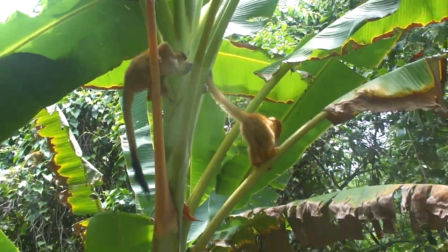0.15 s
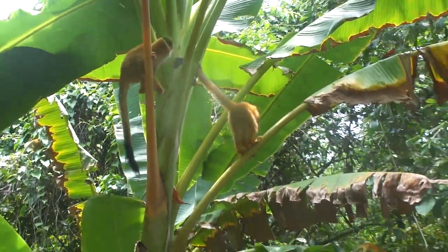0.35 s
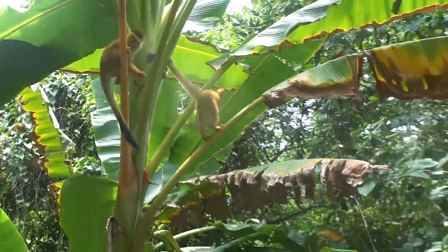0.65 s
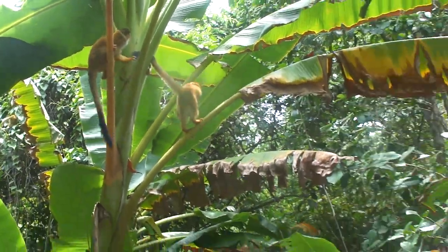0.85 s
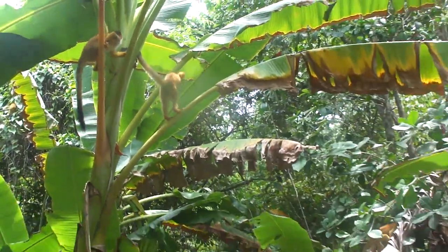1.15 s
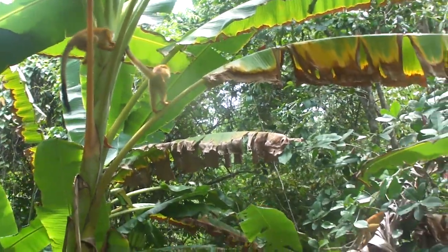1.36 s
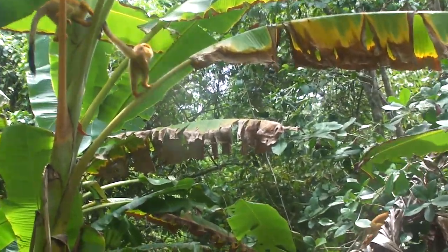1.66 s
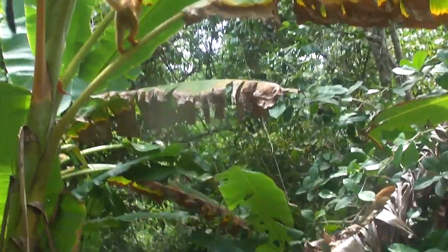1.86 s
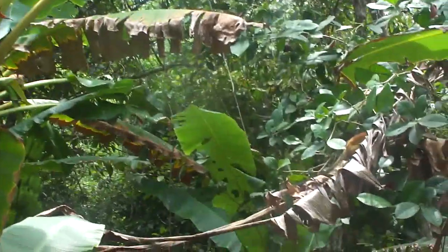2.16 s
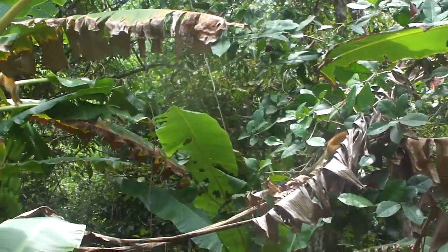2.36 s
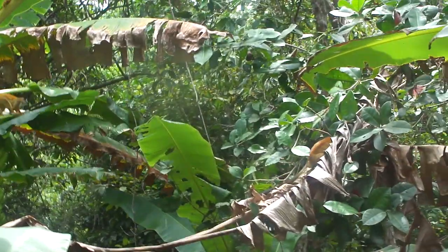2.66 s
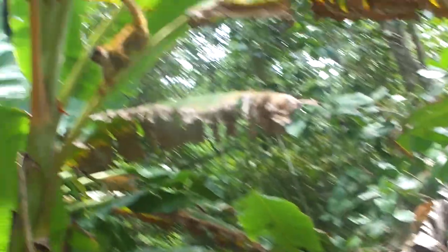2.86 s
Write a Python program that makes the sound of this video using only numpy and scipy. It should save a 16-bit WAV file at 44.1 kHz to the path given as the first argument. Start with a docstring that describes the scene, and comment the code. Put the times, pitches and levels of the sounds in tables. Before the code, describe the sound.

In a dense thicket, a stereo microphone picks up a sharp twig crack, then bright monkey chirps smeared by foliage, more snaps and leaf brushes, and fainter distant peeps, over constant distant rushing and insect hiss.

```python
"""Monkeys peeping in a banana thicket

A stereo microphone hears small monkeys off to the left, some of them farther away: gliding near-sines,
direct and smeared by leaves and trunks. A distant rush of water or leaves is low noise in flickering bands,
under a high hiss and an insect chorus made of narrow-band noise. Twigs snap as short ringing modes with
splinters, thuds and cracks; brushed leaves rustle as grainy noise bursts."""
import sys
import numpy as np
from scipy import signal
from scipy.fft import rfft, irfft
from scipy.io import wavfile
from scipy.ndimage import uniform_filter1d, map_coordinates

SR = 44100
rng = np.random.default_rng(int(sys.argv[2]) if len(sys.argv) > 2 else 0)


def dump(signal):
    """Clip the signal to [-1, 1] and save it as 16-bit WAV at the path in sys.argv[1]."""
    limited = np.clip(np.atleast_2d(signal).T, -1, 1)
    pcm = np.round(limited * 32767).astype(np.int16)
    wavfile.write(sys.argv[1], SR, pcm)


N = 132300
T = np.arange(N) / SR  # time in seconds
F = np.arange(N // 2 + 1) * SR / N  # spectrum bins in Hz

# Colour of the distant rush. Each row: frequency in Hz, relative density in dB per Hz.
RUSH_COLOUR = [(18, -84), (30, -49.5), (122, -18.5), (236, -11), (463, -2), (500, -3.5), (779, -5),
               (891, -5), (981, -8), (1310, -7.5), (2040, -12.5), (2430, -19), (3000, -36), (3900, -71),
               (6600, -120)]
# Colour of the high hiss. Each row: frequency in Hz, relative density in dB per Hz.
HISS_COLOUR = [(2700, -11), (3500, -10.5), (4600, -14), (5500, -4.5), (6300, 0), (7800, 2), (9500, -8),
               (10800, -20.5)]
# Likeness of the two ports in diffuse sound. Each row: frequency in Hz, left-right correlation (0 to 1).
PORT_LIKENESS = [(40, .2), (80, .4), (150, 0.91), (300, 0.97), (600, 0.98), (1200, 0.94), (2400, 0.66),
                 (4900, 0.42), (10200, 0.055)]
# Phase between the ports in diffuse sound. Each row: frequency in Hz, lead of the left in radians.
PORT_LEAD = [(30, 0), (300, -.1), (1000, -.4), (3000, -.6), (6000, -1.), (10400, -2.6)]
# Brushes against leaves. Each row: centre in seconds, width (sigma) in seconds, level in dB.
LEAF_BRUSHES = [(.43, .02, -50), (.5, 0.026, -48), (.62, 0.034, -44.5), (.82, .015, -43),
                (1.41, 0.039, -39), (1.62, 0.024, -42.5), (1.97, 0.025, -55), (2.045, 0.0067, -30.5),
                (2.3, 0.023, -43.5), (2.68, .03, -47)]
# Colour of a leaf rustle. Each row: frequency in Hz, relative density in dB per Hz.
LEAF_COLOUR = [(1500, -20), (2600, -18), (4000, -9), (5500, 1), (7500, 7.5), (10000, -4), (11000, -12)]
# Twig snaps. Each row: start in seconds, ring peak in dB, low thud in dB, bright crack in dB, left over right in dB.
TWIG_SNAPS = [(0.951, -13, -44, -40, 7), (0.9528, -11, -28, -13, 34), (1.415, -30, -13, -80, 17),
              (1.428, -59, -14.5, -80, 8), (1.6155, -24, -10, -50, 12), (1.6275, -22, -15, -42, 22),
              (2.036, -10, -11, -55, 14.5), (2.046, -30, -22, -78, 18), (2.085, -25, -43, -80, 14)]
# Ringing modes of a twig. Each row: frequency in Hz, relative level in dB, 60 dB decay time in seconds.
TWIG_MODES = [(6190, -2, 0.0039), (7460, 1, 0.0027), (9140, -3, .003), (4740, -27, 0.0022)]
# Gliding peeps, some arched, some only falling, one list a call. Each row: time in seconds, pitch in Hz, level in dB.
GLIDING_CALLS = [
    [(1.082, 6900, -38), (1.095, 7700, -30), (1.11, 8900, -33), (1.14, 9950, -41), (1.17, 10520, -37),
     (1.215, 10580, -34), (1.245, 10250, -36), (1.265, 10100, -29), (1.28, 9480, -36), (1.29, 8950, -23),
     (1.295, 7670, -22.5), (1.303, 5600, -27.5)],
    [(1.2, 10300, -52), (1.235, 10080, -39), (1.272, 9450, -41), (1.279, 8600, -48), (1.282, 7600, -29),
     (1.29, 6100, -36)],
    [(1.632, 7700, -33), (1.645, 8250, -32), (1.655, 9100, -38), (1.672, 11300, -58), (1.697, 11550, -53),
     (1.72, 10880, -38), (1.754, 10500, -32.5), (1.778, 9850, -26), (1.793, 9330, -24.5),
     (1.802, 7700, -23), (1.81, 5670, -31)],
    [(1.957, 8850, -30.5), (1.967, 8280, -32), (1.98, 9050, -45), (1.992, 9500, -50), (2.018, 10140, -44),
     (2.05, 10070, -40), (2.081, 10090, -38), (2.107, 9370, -30.5), (2.118, 8760, -29.5),
     (2.126, 7560, -26), (2.137, 5880, -39)],
    [(2.761, 10050, -44), (2.805, 9920, -45), (2.832, 9150, -45), (2.838, 8200, -48), (2.841, 7500, -38),
     (2.849, 5900, -44)],
]
# Level and short peeps farther off. Each row: start in seconds, length in seconds, start pitch in Hz,
# held pitch in Hz, time to reach it in seconds, level in dB before the fade.
DISTANT_PEEPS = [(1.145, .13, 8100, 8800, .033, -37), (1.30, .17, 8750, 8400, .022, -35),
                 (1.972, .055, 8350, 8380, .01, -42), (2.214, .012, 7000, 6000, .012, -46),
                 (2.283, .02, 6900, 6400, .02, -46), (2.558, .11, 8200, 8600, .022, -44),
                 (2.647, .018, 5800, 6950, .018, -45), (2.75, .06, 7400, 9000, .06, -53),
                 (2.815, .095, 10350, 10820, .04, -48), (2.853, .08, 8700, 8400, .015, -44),
                 (2.985, .02, 10600, 10400, .02, -45)]
# Placing of peeps from the left. Each row: pitch in Hz, left over right in dB.
PEEP_PLACING = [(6000, 11), (8500, 12), (10500, 3)]
# Narrow dips in the recorded sound. Each row: centre in Hz, width in Hz, depth in dB.
NARROW_DIPS = [(3007, 210, -25), (4003, 260, -28), (5030, 270, -36)]

# background: rms levels before the balance, and sizes of the random level changes
RUSH_DB, HISS_DB, INSECT_DB = -27.5, -41.5, -44
RUSH_SWELL_DB, RUSH_FLICKER_DB = .25, .5
INSECT_HZ, INSECT_HALF_WIDTH_HZ, INSECT_THROB_DB, THROB_PER_S = 7190, 170, 1.5, 60
BALANCE_DB = 1.15  # left over right
# leaves
LEAF_GRAIN_DB, LEAF_PAN_DB = 2.5, 15.5
# twigs
SNAP_RISE_S, SNAP_WET_DB = .00083, -16
THUD_HZ, THUD_T60_S = 2050, .0074
CRACK_HZ, CRACK_T60_S = 13500, .0022
SPLINTER_DB, SPLINTER_T60_S = -20, .0061
# thicket
FOREST_T60_S, FOREST_PAN_DB = .37, 12
SWAY_S, SWAY_PER_S = .000016, 400
# peeps
PEEP_EDGE_S, WOBBLE = .004, .004  # WOBBLE is a fraction of the pitch
NEAR_FLUTTER_DB, FAR_FLUTTER_DB, FLUTTER_PER_S = 3., 4., 350
NEAR_WET_DB, FAR_WET_DB, FAR_FADE_DB_PER_S = 0., -1., 55
# microphone and recorder
LEFT_LAG_S = .000027
DIFFUSE_TOP_HZ, RECORDER_TOP_HZ = 11100, 15600


def undb(db):
    """dB to gain."""
    return 10 ** (np.asarray(db) / 20)


def level(x, db):
    """Scale to an rms level in dB."""
    return x * undb(db) / np.sqrt(np.mean(x ** 2))


def on_hz(table, hz):
    """Read a (Hz, value) table on a log frequency axis."""
    table = np.array(table, float)
    return np.interp(np.log(hz + 1), np.log(table[:, 0]), table[:, 1])


def walk(rate):
    """Random values drawn at a rate per second, held, then smoothed twice."""
    hold = max(int(SR / rate), 1)
    steps = np.repeat(rng.standard_normal(N // hold + 1), hold)
    smooth = uniform_filter1d(uniform_filter1d(steps, hold), hold)
    return 1.22 * smooth[:N]  # makes up for the smoothing


def lean_left(x, pan_db):
    """A sound from the left is louder there; takes mono or a stereo pair."""
    return x * undb(np.array([[.5], [-.5]]) * pan_db)


def wide(gain):
    """Diffuse noise of a given colour as two microphone ports hear it: alike in the lows, less so higher."""
    likeness = np.clip(on_hz(PORT_LIKENESS, F), 0, 1)
    mid, side = rfft(rng.standard_normal((2, N))) * gain
    mid = np.sqrt(1 + likeness) * mid
    side = np.sqrt(1 - likeness) * side
    turn = np.exp(1j * on_hz(PORT_LEAD, F) / 2)
    return irfft(np.array([(mid + side) * turn, (mid - side) / turn]), N)


def distant_rush():
    """Water or leaves far off: low noise in octave-spaced bands that swell together and flicker alone."""
    rush, swell = 0, walk(1.5)
    colour = undb(on_hz(RUSH_COLOUR, F)) * (F < 3000)
    for hz in 40 * 2. ** np.arange(7):
        band = np.clip(1 - np.abs(np.log2((F + 1) / hz)), 0, 1) ** .5
        flicker_db = RUSH_SWELL_DB * swell + RUSH_FLICKER_DB * walk(8.16)
        rush = rush + wide(colour * band) * undb(flicker_db)
    return level(rush, RUSH_DB)


def high_hiss():
    """Steady diffuse noise above the rush."""
    colour = undb(on_hz(HISS_COLOUR, F)) * (F > 2700) * (F < DIFFUSE_TOP_HZ)
    return level(wide(colour), HISS_DB)


def insect_chorus():
    """Many insects blend into a narrow noise band that throbs irregularly."""
    band = 1 / (1 + ((F - INSECT_HZ) / INSECT_HALF_WIDTH_HZ) ** 2)
    chorus = wide(band) * undb(INSECT_THROB_DB * walk(THROB_PER_S))
    return level(chorus, INSECT_DB)


def background():
    """Rush, hiss and insects around the microphone, a little stronger on the left."""
    return lean_left(distant_rush() + high_hiss() + insect_chorus(), BALANCE_DB)


def rustles():
    """Leaves brushed to the left: grainy noise swelling and dying in bell-shaped bursts."""
    bursts = sum(undb(db) * np.exp(-.5 * ((T - s) / width) ** 2) for s, width, db in LEAF_BRUSHES)
    low_cut = np.clip(F / 1500, 0, 1) ** 2
    noise = wide(undb(on_hz(LEAF_COLOUR, F)) * (F < DIFFUSE_TOP_HZ) * low_cut)
    grains = noise * undb(LEAF_GRAIN_DB * walk(250))
    return lean_left(level(grains, 0) * bursts, LEAF_PAN_DB)


def snaps():
    """Each break rings the twig's short modes, with noisy splinters, a low thud and a bright crack."""
    direct, to_forest = 0, 0
    phases = rng.uniform(0, 2 * np.pi, (len(TWIG_SNAPS), len(TWIG_MODES)))
    grit = rfft(rng.standard_normal(N)) * (F > 1200) * (F < DIFFUSE_TOP_HZ)
    grit = level(irfft(grit, N), 0)
    for (start, ring_db, thud_db, crack_db, pan_db), phase in zip(TWIG_SNAPS, phases):
        t = np.maximum(T - start, 0)
        rise = np.sin(np.pi / 2 * np.clip(t / SNAP_RISE_S, 0, 1)) ** 2

        def mode(hz, db, t60, p=0):
            """One decaying sine of the struck wood."""
            return rise * undb(db - 60 * t / t60) * np.sin(2 * np.pi * hz * t + p)

        ring = sum(mode(*m, p) for m, p in zip(TWIG_MODES, phase))
        splinters = rise * undb(SPLINTER_DB - 60 * t / SPLINTER_T60_S) * grit
        snap = undb(ring_db) * (ring / np.abs(ring).max() + splinters)
        snap += mode(THUD_HZ, thud_db, THUD_T60_S)
        snap += mode(THUD_HZ * .616, thud_db - 3, THUD_T60_S)
        snap += mode(CRACK_HZ, crack_db, CRACK_T60_S)
        direct = direct + lean_left(snap, pan_db)
        to_forest = to_forest + undb(SNAP_WET_DB) * snap
    return direct, to_forest


def forest(x):
    """Leaves and trunks scatter sound into a dense tail, unrelated left and right; swaying paths blur pitch."""
    swayed_s = T + SWAY_S * walk(SWAY_PER_S)
    x = map_coordinates(x, [swayed_s * SR], order=5)
    t = T[:SR]
    build_up = 1 - np.exp(-t / .0011)
    tail = rng.standard_normal((2, SR)) * undb(-60 * t / FOREST_T60_S) * build_up
    tail /= np.sqrt(np.sum(tail ** 2, axis=1, keepdims=True))
    return lean_left(signal.fftconvolve(x[None], tail, axes=1)[:, :N], FOREST_PAN_DB)


def whistle(start, end, hz, db, flutter_db):
    """A near-sine peep, soft-edged and wavering in pitch: mono, and placed with a flutter through leaves."""
    to_edge = np.minimum(T - start, end - T)
    edge = np.sin(np.pi / 2 * np.clip(to_edge / PEEP_EDGE_S, 0, 1)) ** 2
    cycles = np.cumsum(hz * (1 + WOBBLE * walk(150))) / SR
    mono = edge * np.sqrt(2) * undb(db) * np.sin(2 * np.pi * cycles)
    fluttering = mono * undb(flutter_db * walk(FLUTTER_PER_S))
    return mono, lean_left(fluttering, on_hz(PEEP_PLACING, hz))


def monkeys():
    """Near gliding peeps and farther ones that slide to a held pitch; direct, and sent to the forest."""
    direct, to_forest = 0, 0
    for call in GLIDING_CALLS:
        s, pitch, db = np.array(call, float).T
        mono, pair = whistle(s[0], s[-1], np.interp(T, s, pitch), np.interp(T, s, db), NEAR_FLUTTER_DB)
        direct = direct + pair
        to_forest = to_forest + undb(NEAR_WET_DB) * mono
    for start, length, start_hz, held_hz, rise, db in DISTANT_PEEPS:
        hz = np.interp(T, [start, start + rise], [start_hz, held_hz])
        fade_db = FAR_FADE_DB_PER_S * np.clip(T - start - rise, 0, length)
        mono, pair = whistle(start, start + length, hz, db - fade_db, FAR_FLUTTER_DB)
        direct = direct + pair
        to_forest = to_forest + undb(FAR_WET_DB) * mono
    return direct, to_forest


def scene():
    """Direct sounds, slightly late at the left port, with their scattering, the rustles and the background."""
    twigs, twigs_to_forest = snaps()
    peeps, peeps_to_forest = monkeys()
    lag = np.exp(-2j * np.pi * F * LEFT_LAG_S * np.array([[1], [0]]))
    direct = irfft(rfft(peeps + twigs) * lag, N)
    diffuse = background() + rustles() + forest(peeps_to_forest + twigs_to_forest)
    return direct + irfft(rfft(diffuse) * (F < DIFFUSE_TOP_HZ), N)


def record(dry):
    """Three narrow dips thin the sound; the recorder clips and cuts the top."""
    dips_db = sum(db * np.exp(-(2 * (F - hz) / width) ** 2) for hz, width, db in NARROW_DIPS)
    x = np.clip(irfft(rfft(dry) * undb(dips_db), N), -1, 1)
    top_cut = signal.ellip(8, .2, 70, RECORDER_TOP_HZ, fs=SR, output="sos")
    return signal.sosfilt(top_cut, x)


dry = scene()
out = record(dry)
dump(out)
```